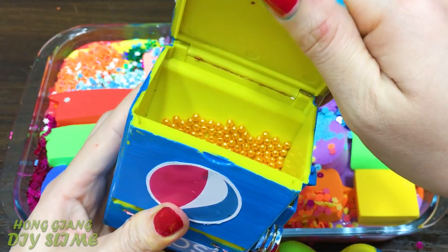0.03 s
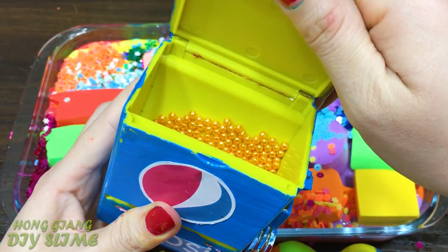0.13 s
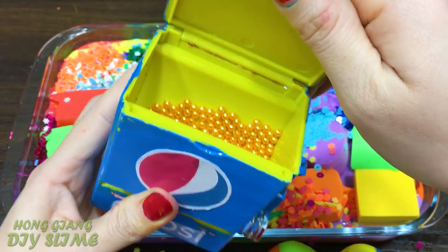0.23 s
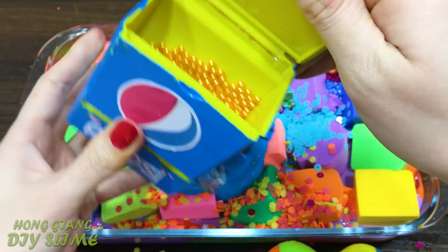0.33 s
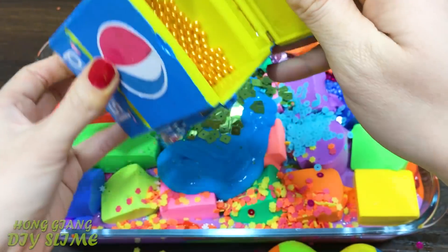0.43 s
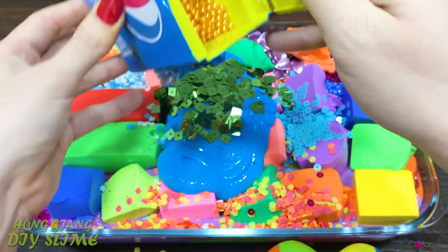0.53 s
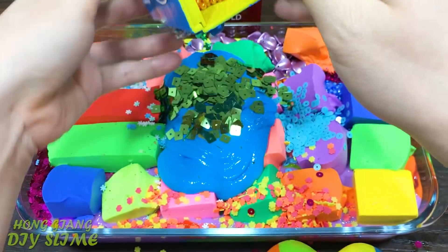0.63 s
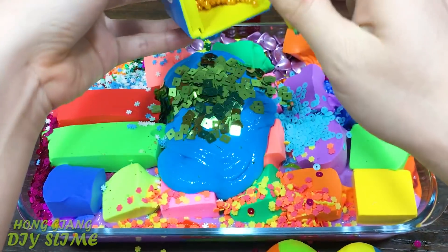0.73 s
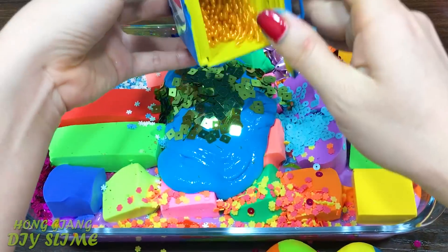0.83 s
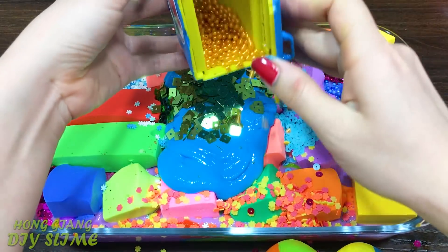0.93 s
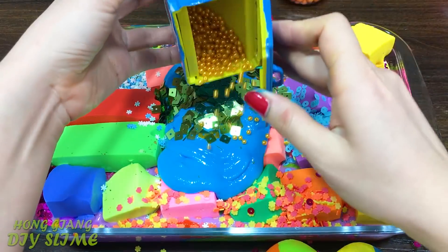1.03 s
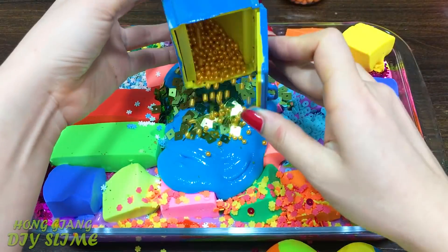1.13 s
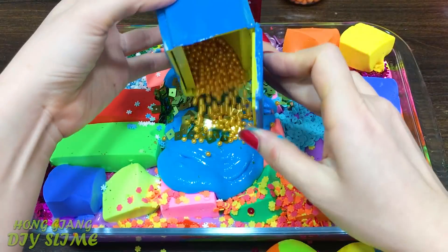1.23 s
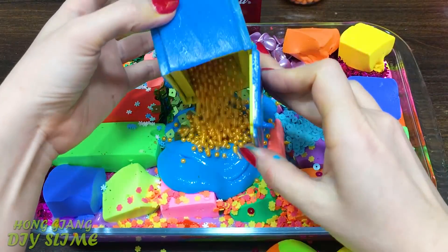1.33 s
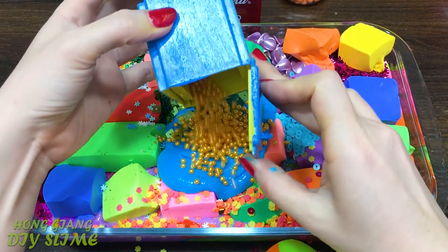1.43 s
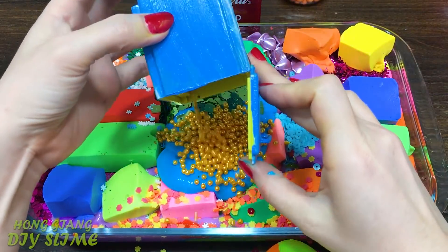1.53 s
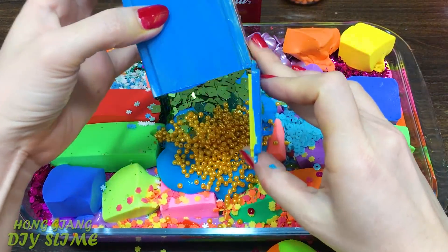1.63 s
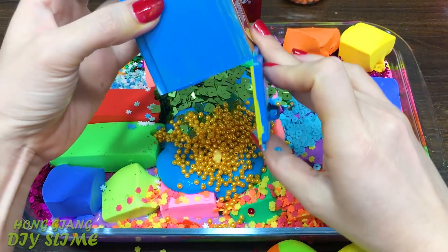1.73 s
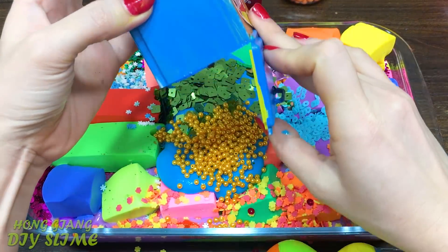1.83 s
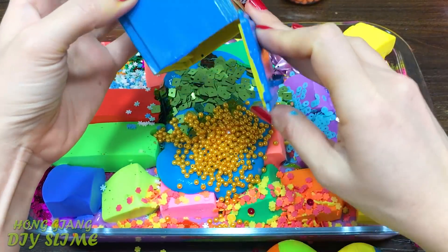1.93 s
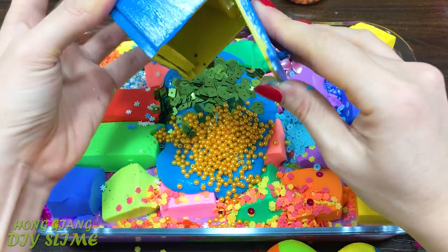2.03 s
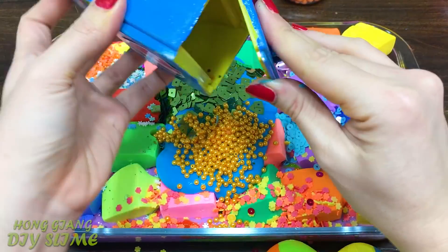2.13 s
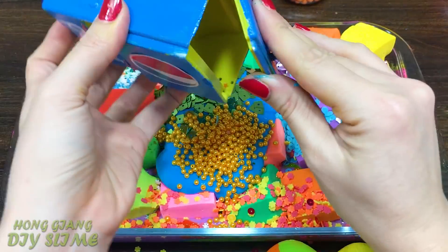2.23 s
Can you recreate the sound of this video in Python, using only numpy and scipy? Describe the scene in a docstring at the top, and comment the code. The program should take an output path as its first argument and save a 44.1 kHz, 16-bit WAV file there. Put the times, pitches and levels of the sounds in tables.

```python
"""A quiet room, where a small plastic box of hard beads is opened close to the microphone.
The tight lid creaks (swept bending waves); its catch snaps, the lid slaps open and bounces (flex, crack, ring).
The beads jump, shift as the box tilts, then roll out onto soft slime (dense random impacts, coloured by the box).
The emptying box rings hollow (a narrow air resonance). Room rumble, hum, hiss and handling lie underneath."""
import sys
import numpy as np
from scipy import signal
from scipy.fft import irfft
from scipy.io import wavfile

SR = 44100
rng = np.random.default_rng(int(sys.argv[2]) if len(sys.argv) > 2 else 0)


def generate_wav(sig):
    """Save sig (samples, or channels by samples) to the path in sys.argv[1] as 16-bit PCM at SR."""
    pcm = np.round(np.clip(np.atleast_2d(sig).T, -1, 1) * 32767).astype(np.int16)
    wavfile.write(sys.argv[1], SR, pcm)


N = 101430
TIME = np.arange(N) / SR  # s
BINS = np.fft.rfftfreq(4096, 1 / SR)  # Hz


def amp(db):
    """Decibels to gain."""
    return 10 ** (np.asarray(db) / 20)


def read(points, hz):
    """Reads a spectrum table on a log-frequency axis."""
    f, value = np.transpose(points)
    return np.interp(np.log(hz + 1), np.log(f), value)


def add(mix, s, sound):
    """Adds a sound to the mix, starting at s seconds."""
    part = mix[max(round(s * SR), 0):][:len(sound)]
    part += sound[:len(part)]


def fade(t60_s, size=4096):
    """Exponential decay, 60 dB in t60_s."""
    return amp(-60 * TIME[:size] / t60_s)


PEAK_Q = 18


def colour(x, tone, peaks=()):
    """Causal (minimum-phase) filter of unit energy: a broad spectrum with resonances on top."""
    db = read(tone, BINS)
    for hz, lift_db in peaks:
        db = db + lift_db / (1 + (2 * PEAK_Q * (BINS / hz - 1)) ** 2)
    log_gain = np.log(amp(np.r_[db, db[-2:0:-1]]))
    min_phase = np.exp(np.conj(signal.hilbert(log_gain)))
    taps = np.fft.ifft(min_phase).real
    return signal.fftconvolve(x, taps / np.linalg.norm(taps))[:len(x)]


def burst(t60_s, size=4096):
    """A contact scattered into dense dying reflections: random signs under a decay."""
    return rng.choice([-1., 1.], size) * fade(t60_s, size)


def flex(tone, lag_s):
    """Bending wave in a thin wall, peak 1: treble arrives first; lag_s is the travel time at 1 kHz."""
    phase = -4 * np.pi * lag_s * np.sqrt(1000 * BINS)
    sweep = irfft(np.exp(1j * phase))[:2048]
    wave = colour(sweep, tone)
    return wave / abs(wave).max()


# room decay: (frequency [Hz], t60 [s])
ROOM_T60 = [(100, .25), (600, 0.25), (2000, .16), (8000, .14), (16000, 0.18)]


def room(x, wet_db):
    """Adds the short tail of a small furnished room: noise dying at its own rate in each band."""
    noise = rng.standard_normal(SR // 2) * (TIME[:SR // 2] > .004)  # 4 ms before the tail
    hz, t, bands = signal.stft(noise, SR, nperseg=256)
    decay = amp(-60 * t / read(ROOM_T60, hz)[:, None])
    tail = signal.istft(bands * decay, SR, nperseg=256)[1]
    return x + amp(wet_db) * signal.fftconvolve(x, tail / np.linalg.norm(tail))[:N]


# HITS_PER_S holds at level HITS_AT_DB; CROWDING is the rise of rate with level (dB per dB)
HITS_PER_S, HITS_AT_DB, CROWDING = 3500, -25, .55
SIZE_SPREAD_DB, HIT_T60_S = 1, 0.0048
CLUMP_S, CLUMP_DB = .004, 1.1


def collisions(curve, count=64):
    """Many tiny impacts in clumps; a livelier heap gives both more and harder ones."""
    db = np.interp(TIME, *np.transpose(curve), left=-120, right=-120)
    db = db + CLUMP_DB * np.interp(TIME / CLUMP_S, np.arange(N), rng.standard_normal(N))
    chance = HITS_PER_S * amp(CROWDING * (db - HITS_AT_DB)) / SR  # per sample
    strength = amp(SIZE_SPREAD_DB * np.clip(rng.standard_normal(N), -2, 2))
    at = np.flatnonzero(rng.random(N) < chance)
    sign = rng.choice([-1., 1.], N)[at]
    kind = rng.integers(0, count, N)[at]
    # dividing by the root of the rate keeps the mean power on the curve
    hits = sign * strength[at] * amp(db[at]) / np.sqrt(chance[at] * np.mean(strength ** 2))
    ticks = np.array([burst(HIT_T60_S, size=384) for _ in range(count)])
    sounds = hits[:, None] * ticks[kind] / np.linalg.norm(ticks[0])
    places = at[:, None] + np.arange(ticks.shape[1])
    return np.bincount(places.ravel(), sounds.ravel(), N)[:N]


# room noise spectrum: (frequency [Hz], level [dB])
FLOOR_TONE = [(12, -48), (25, -25), (42, -16.5), (62, -0.5), (85, -2.5), (105, -9.5), (200, -11.5),
              (300, -10), (750, -20.5), (1200, -21.5), (2200, -21), (4500, -26.5), (7000, -29),
              (16000, -31.5)]
FLOOR_DB = -65.5
HUM_HZ, HUM_DB = 204, -69.5


def floor():
    """Low room rumble and hiss as coloured noise, with a faint sine hum."""
    noise = amp(FLOOR_DB) * colour(rng.standard_normal(N), FLOOR_TONE)
    hum = amp(HUM_DB) * np.sin(2 * np.pi * HUM_HZ * TIME)
    return noise + hum


# hands on the box: (time [s], level [dB])
RUMBLE = [(0, -61), (.06, -74), (.6, -77), (1, -73.5), (1.15, -64), (1.35, -65), (1.95, -69.5), (2.1, -58),
          (2.3, -66.5)]
# rumble spectrum: (frequency [Hz], level [dB])
RUMBLE_TONE = [(25, -25.5), (50, -9), (80, -1), (140, -3.5), (250, -16.5), (800, -18.5), (2000, -32.5),
               (16000, -67)]


def rumble():
    """Hands turning the box: low noise that follows a level curve."""
    level = amp(np.interp(TIME, *np.transpose(RUMBLE)))
    return level * colour(rng.standard_normal(N), RUMBLE_TONE)


# single beads and fingernails on the wall: (time [s], level [dB])
CLICKS = [(0.0583, -28), (0.774, -35), (0.8237, -31.5), (0.8471, -24), (0.8738, -27.5), (0.903, -29.5),
          (.918, -32.5), (0.93, -35), (.936, -42), (0.9396, -43), (1.1246, -28.5), (1.137, -30),
          (1.1654, -24.5), (1.175, -29), (1.229, -22), (1.332, -26), (1.638, -12.5), (1.68, -14),
          (1.952, -24), (2.008, -15.5), (2.045, -21.5), (2.102, -25), (2.116, -33), (2.14, -24.5),
          (2.174, -32.5), (2.2236, -38), (2.256, -36.5)]
# click spectrum: (frequency [Hz], level [dB])
CLICK_TONE = [(100, -50), (600, -35), (1100, -5.5), (2200, -3.5), (5000, -8.5), (6500, 1), (8500, -1),
              (12000, -4.5), (16000, -4)]
CLICK_T60_S = 0.0094


def clicks():
    """Single beads and fingernails tap the wall: short coloured bursts."""
    out = np.zeros(N)
    for s, db in CLICKS:
        add(out, s, amp(db) * burst(CLICK_T60_S) / 2)
    return colour(out, CLICK_TONE)


# a finger slips on the plastic: (time [s], level [dB])
SLIPS = [(0.6451, -45), (.6496, -46.5), (.656, -38.5)]
SLIP_HZ, SLIP_S = 2275, 0.00043


def slips():
    """A finger slips on the plastic: brief Gaussian tone pulses."""
    out = np.zeros(N)
    for s, db in SLIPS:
        t = TIME - s
        out += amp(db) * np.exp(-(t / SLIP_S) ** 2) * np.cos(2 * np.pi * SLIP_HZ * t)
    return out


# the box is bumped: (time [s], level [dB], pitch [Hz], t60 [s])
KNOCKS = [(0.8425, -43.5, 1445, 0.023), (1.641, -23, 1370, 0.023)]
KNOCK_RISE_S = .001
KNOCK_OVERTONE, KNOCK_OVERTONE_DB = 2.12, 2  # frequency ratio, level against the fundamental


def knocks():
    """Bumps ring the box: a decaying tone with one inharmonic overtone."""
    out, t = np.zeros(N), TIME[:4096]
    for s, db, hz, t60_s in KNOCKS:
        turn = 2 * np.pi * hz * t
        shape = fade(t60_s) * (1 - np.exp(-(t / KNOCK_RISE_S) ** 2))
        tone = np.sin(turn) + amp(KNOCK_OVERTONE_DB) * np.sin(KNOCK_OVERTONE * turn)
        add(out, s, amp(db) * shape * tone)
    return out


# grip noise spectrum: (frequency [Hz], level [dB])
GRIP_TONE = [(40, -7.5), (110, 15), (350, 4.5), (700, -6), (3000, 4), (5500, -7), (9000, 5), (16000, -2)]
GRIP_S, GRIP_RISE_S, GRIP_T60_S, GRIP_DB = .836, 0.0057, 0.08, -41


def grip():
    """The grip shifts: one soft swell of coloured noise."""
    out, t = np.zeros(N), TIME[:4096]
    rub = np.minimum(t / GRIP_RISE_S, 1) ** 2 * fade(GRIP_T60_S)
    noise = rng.standard_normal(len(t)) * rub / rub.max()
    add(out, GRIP_S, amp(GRIP_DB) * colour(noise, GRIP_TONE))
    return out


# creaks of the tight lid: (time [s], level [dB])
CREAKS = [(0.0407, -26), (0.1235, -29.5), (0.1673, -32.5), (.2020, -28.5)]
# creak spectrum: (frequency [Hz], level [dB])
CREAK_TONE = [(100, -29.5), (300, -13.5), (570, 2), (880, -5.5), (1200, 3.5), (2000, -11), (4200, -23.5),
              (7000, -39.5), (16000, -65)]
CREAK_LAG_S, CREAK_ROOM_DB = .0025, -13


def creaks():
    """The lid sticks and slips under the thumb; each slip sends a bending wave through the wall."""
    out = np.zeros(N)
    for s, db in CREAKS:
        add(out, s, amp(db) * flex(CREAK_TONE, CREAK_LAG_S))
    return room(out, CREAK_ROOM_DB)


# catch and lid: (time [s], flexing [dB], crack [dB], ring [dB])
SNAPS = [(0.221, -8, -6.5, -25), (0.2598, -0.5, -3, -17), (.2765, -19.5, -20, -25)]
# flexing spectrum: (frequency [Hz], level [dB])
SNAP_TONE = [(30, -46.5), (70, -35.5), (150, -20.5), (260, -15), (380, -1), (600, 0), (740, 1),
             (980, -17.5), (1280, 1.5), (1700, -7), (2600, -3), (5000, -13.5), (16000, -39.5)]
# crack spectrum: (frequency [Hz], level [dB])
CRACK_TONE = [(200, -22), (1500, 11), (4500, -5.5), (6500, -1.5), (11000, 4.5), (16000, 0.5)]
# ring of the open box: (frequency [Hz], level [dB], t60 [s])
BOX_MODES = [(367, -24.5, .2), (425.8, -18.5, .15), (577, -19, .15), (599, -17.5, .17), (700, -20.5, .12),
             (1397, 4.5, .04), (1546, -2, 0.023), (1470, -14, 0.048), (2103, -3, .07), (2630, -14, .07),
             (4650, -17.5, 0.093)]
# a small wall radiates little bass: (frequency [Hz], level [dB])
WALL_TONE = [(30, -17.5), (80, -9.5), (160, -4), (300, -0.5), (16000, 0)]
# wall resonances and dips: (frequency [Hz], lift [dB])
WALL_PEAKS = [(1350, 3), (1850, -9.5), (2110, 5), (2580, 3.5), (2900, 2.5), (3330, -12.5), (3750, 7),
              (4800, 8)]
SNAP_LAG_S, SNAP_LEAD_S, CRACK_T60_S = .0017, 0.00055, 0.024
SNAP_ROOM_DB = -16.5


def snaps():
    """The catch lets go, the lid slaps back and bounces: the wall flexes, cracks and rings."""
    out = np.zeros(N)
    t = TIME[:12000]
    ring = np.zeros(len(t))
    for hz, db, t60_s in BOX_MODES:
        ring += amp(db) * fade(t60_s, size=len(t)) * np.sin(2 * np.pi * hz * t)
    for s, flex_db, crack_db, ring_db in SNAPS:
        add(out, s - SNAP_LEAD_S, amp(flex_db) * flex(SNAP_TONE, SNAP_LAG_S))
        add(out, s, amp(crack_db) * colour(burst(CRACK_T60_S), CRACK_TONE) / 2)
        add(out, s, amp(ring_db) * ring)
    return room(colour(out, WALL_TONE, WALL_PEAKS), SNAP_ROOM_DB)


# beads jumping in the box: (time [s], level [dB])
RATTLE = [(0, -66), (.05, -75), (.065, -74), (.11, -93), (.205, -76), (.219, -38), (.225, -29), (.257, -53),
          (.265, -32.5), (.272, -25.5), (.278, -18), (.288, -22), (.31, -24), (.335, -35), (.368, -39.5),
          (.39, -49), (.43, -55), (.47, -70), (.55, -77), (.82, -72), (.86, -64.5), (.93, -55.5),
          (1, -76.5), (1.075, -63.5), (1.11, -65.5)]
# rattle spectrum: (frequency [Hz], level [dB])
RATTLE_TONE = [(100, -20), (350, -6), (650, -13.5), (950, -23), (1400, -5), (3000, -6), (6000, -4.5),
               (9000, -3.5), (12000, -1), (16000, -1.5)]
# rattle resonances: (frequency [Hz], lift [dB])
RATTLE_PEAKS = [(619, 8.5), (2080, 5.5), (3470, 4), (5110, 3), (7210, 6), (8740, 10), (12500, 0.5)]


def rattle():
    """Jolted beads bounce and settle: impacts coloured by the box."""
    return colour(collisions(RATTLE), RATTLE_TONE, RATTLE_PEAKS)


# air resonance of the emptying box: (time [s], level [dB])
CAVITY = [(1.11, -80), (1.135, -58), (1.23, -58), (1.3, -50), (1.6, -45), (1.78, -42.5), (1.95, -35),
          (2.03, -36.5), (2.1, -43.5), (2.135, -55), (2.19, -69)]
CAVITY_HZ, CAVITY_WIDTH_HZ = 2079, 230


def cavity():
    """Impacts excite the air in the box, more as the beads make room."""
    edges_hz = CAVITY_HZ + np.array([-.5, .5]) * CAVITY_WIDTH_HZ
    band = signal.butter(2, edges_hz, "band", fs=SR)
    ring = signal.lfilter(*band, signal.unit_impulse(2048))
    return signal.oaconvolve(collisions(CAVITY), ring / np.linalg.norm(ring))[:N]


# beads running out: (time [s], level [dB])
POUR = [(1.11, -73), (1.135, -53), (1.19, -41.5), (1.225, -47), (1.26, -33), (1.31, -30.5), (1.35, -25),
        (1.41, -25), (1.5, -23.5), (1.58, -29.5), (1.65, -29), (1.74, -29), (1.85, -26.5), (1.98, -27),
        (2.06, -33.5), (2.12, -41.5), (2.18, -53), (2.23, -59), (2.3, -58.5)]
# full-box spectrum: (frequency [Hz], level [dB])
FULL_TONE = [(100, -30), (600, -27), (1000, -19), (1350, -7.5), (1900, -3), (3300, -5.5), (5500, -3.5),
             (8000, 0), (11000, 2.5), (16000, 1)]
# full-box resonances: (frequency [Hz], lift [dB])
FULL_PEAKS = [(4080, 8.5), (8480, 4), (12800, 0)]
# empty-box spectrum: (frequency [Hz], level [dB])
EMPTY_TONE = [(100, -27), (600, -30.5), (1000, -21.5), (1350, -14), (2800, -7), (3700, 0), (5600, -6),
              (8000, -4.5), (11500, 2), (13500, -1), (16000, -0.5)]
# empty-box resonances: (frequency [Hz], lift [dB])
EMPTY_PEAKS = [(3750, 0.5), (4080, 7.5), (4820, 7), (6760, 8), (9030, 5), (10800, 5.5)]
EMPTY_FROM_S, EMPTY_BY_S = 1.43, 1.9
# pitches of beads clacking together: [Hz]
CLACK_HZ = [7620, 8100, 8450, 8590, 9200, 11970]
# rate over all pitches, time to the ping's peak, level against POUR, mean random drop
CLACKS_PER_S, CLACK_S, CLACK_DB, CLACK_SPREAD_DB = 70, 0.00076, 5.5, 4.5


def pour():
    """Beads roll over the wall and clack together; the colour crossfades as the box empties."""
    empty = np.clip((TIME - EMPTY_FROM_S) / (EMPTY_BY_S - EMPTY_FROM_S), 0, 1)
    out = colour(collisions(POUR) * np.sqrt(1 - empty), FULL_TONE, FULL_PEAKS)
    out += colour(collisions(POUR) * np.sqrt(empty), EMPTY_TONE, EMPTY_PEAKS)
    level = amp(CLACK_DB + np.interp(TIME, *np.transpose(POUR), left=-120))
    level = level * (1 - empty / 2)
    t = TIME[:512]
    for hz in CLACK_HZ:
        struck = rng.random(N) < CLACKS_PER_S / len(CLACK_HZ) / SR
        clacks = struck * amp(-CLACK_SPREAD_DB * rng.exponential(1, N))
        ping = t / CLACK_S * np.exp(1 - t / CLACK_S) * np.sin(2 * np.pi * hz * t)
        out += signal.oaconvolve(clacks * level, ping)[:N]
    return out


ROOM_DB = -12


def scene():
    """The box and its beads in the room."""
    background = floor() + rumble()
    handling = clicks() + slips() + knocks() + grip()
    lid = creaks() + snaps()
    beads = rattle() + cavity() + pour()
    return (background + lid + room(handling + beads, ROOM_DB))[None]


EDGE_HZ = 15800


def record(dry):
    """Full-scale overload, then the band limit."""
    lowpass = signal.firwin(401, EDGE_HZ, window=("kaiser", 8), fs=SR)
    return signal.oaconvolve(np.clip(dry, -1, 1), lowpass[None], "same")


dry = scene()
out = record(dry)
generate_wav(out)
```